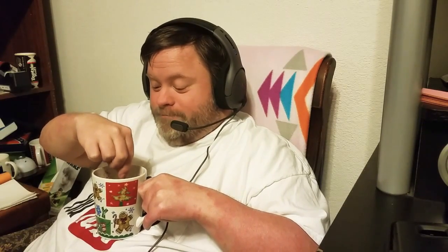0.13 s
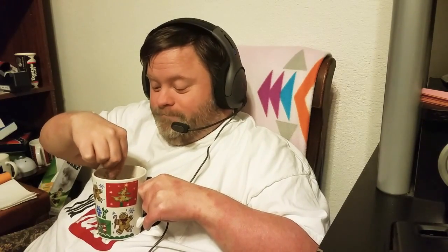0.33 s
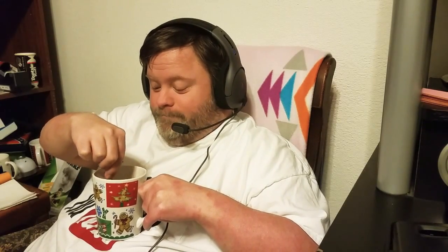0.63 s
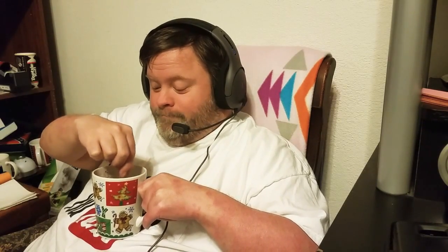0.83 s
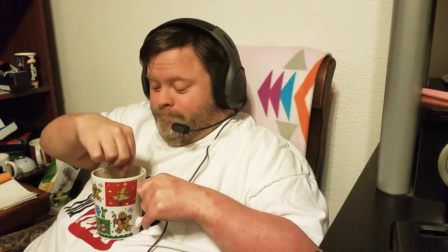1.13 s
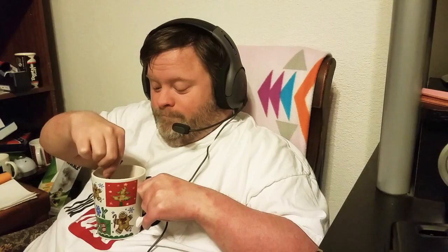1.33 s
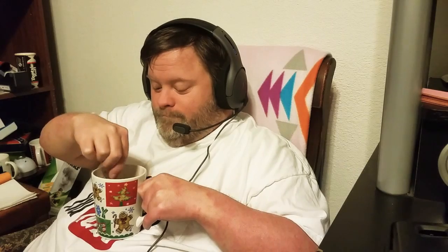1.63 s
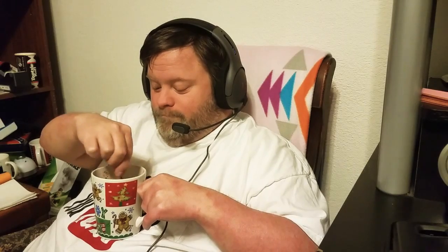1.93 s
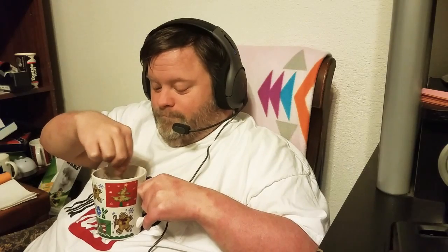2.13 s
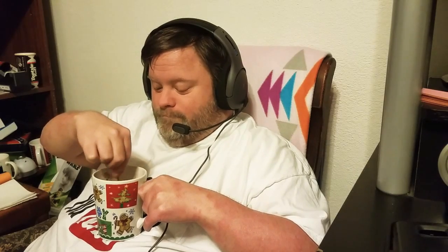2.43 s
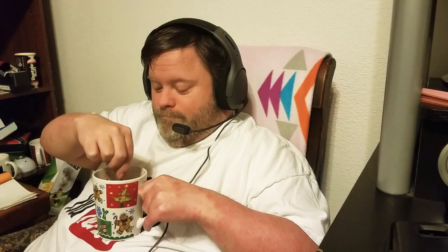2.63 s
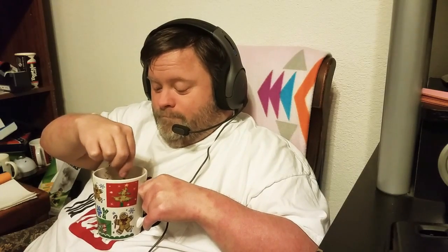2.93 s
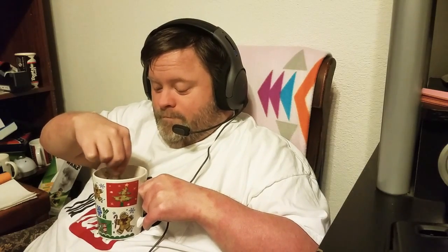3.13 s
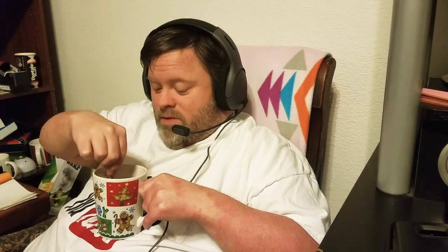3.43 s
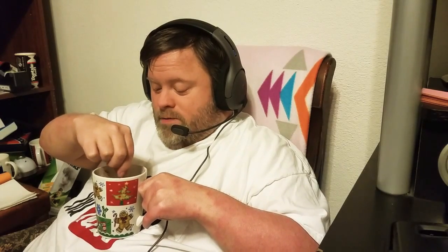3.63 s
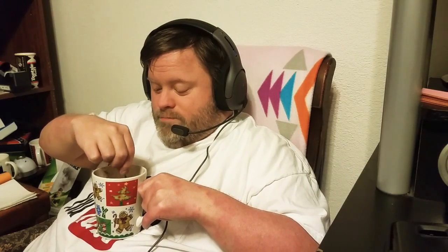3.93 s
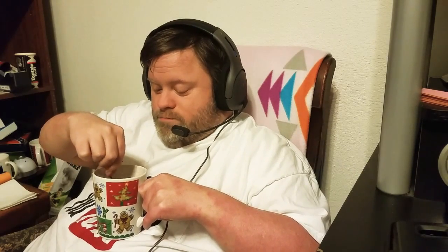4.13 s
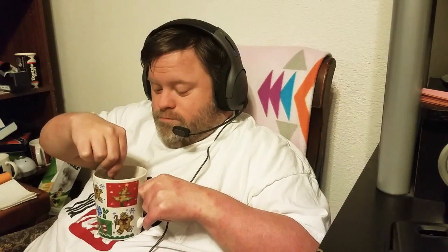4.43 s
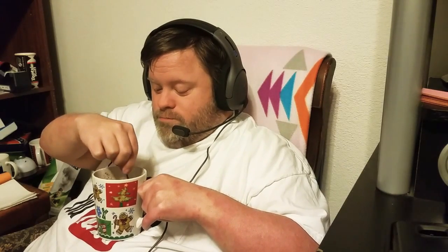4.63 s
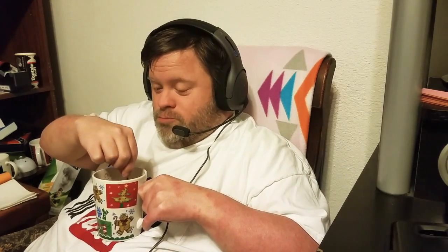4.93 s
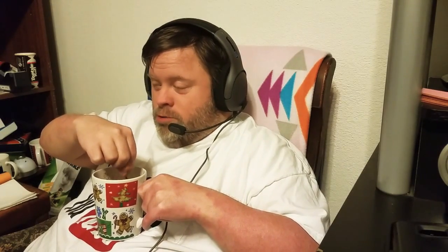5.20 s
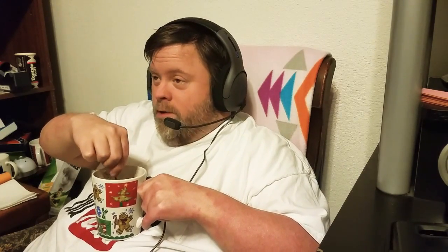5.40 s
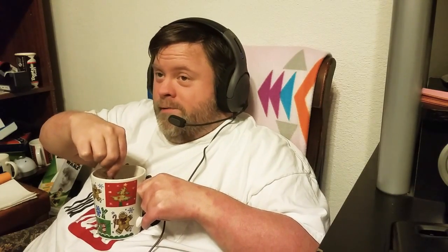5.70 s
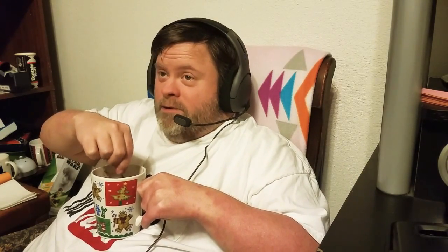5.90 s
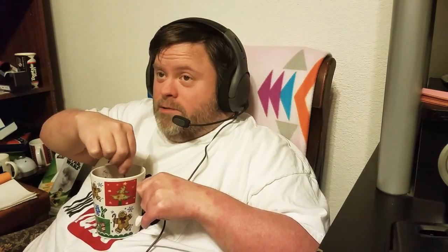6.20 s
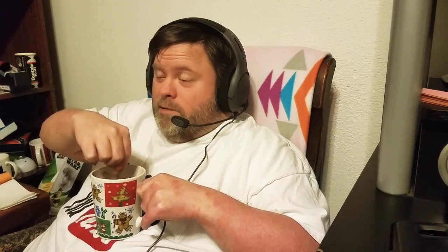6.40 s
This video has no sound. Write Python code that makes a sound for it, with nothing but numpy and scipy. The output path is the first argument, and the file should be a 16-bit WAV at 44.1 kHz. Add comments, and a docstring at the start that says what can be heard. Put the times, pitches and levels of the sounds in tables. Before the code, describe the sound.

A metal spoon stirs liquid in a hand-held ceramic mug, close up in a small furnished room. From the first moment, uneven short clinks and dull knocks mix with quiet gritty scrapes, roughly three turns a second. The ring is heavily damped. A low rumble swells near two seconds and after four; a faint hum and slight rustle come later.

```python
"""A metal spoon stirs a drink in a hand-held mug in a small, furnished room.
From the first moment it clinks unevenly on the wall: a noisy crack, a short pitched knock, damped ringing modes.
On each turn it drags across the bottom, up along the wall, then swipes back: random slips through gliding resonances.
Low rumble, shaped noise, swells most near 2 s and again after 4 s; from about 3 s a faint narrow-band
hum comes and goes, and a soft band of rustle enters after 5 s. Steady room noise lies beneath it all."""
import sys
import numpy as np
from scipy import signal
from scipy.fft import rfft, irfft
from scipy.io import wavfile
from scipy.ndimage import uniform_filter1d

SR = 44100
rng = np.random.default_rng(int(sys.argv[2]) if len(sys.argv) > 2 else 0)


def wav_out(sig):
    """Save sig, one row per channel (or a flat mono array), as 16-bit PCM at SR to the path in sys.argv[1]."""
    wavfile.write(sys.argv[1], SR, np.round(np.clip(np.atleast_2d(sig).T, -1, 1) * 32767).astype(np.int16))


N = 289119

# turns of the spoon, across the bottom and then up along the wall; levels are relative:
# start_s, bottom_length_s, wall_length_s, bottom_level_db, wall_level_db
TURNS = [(0.0, 0.13, 0.038, -48, -43.5), (0.318, 0.13, 0.1, -48.5, -47.5), (0.654, .11, 0.11, -50, -46.5),
         (0.971, 0.17, 0.08, -52, -48.5), (1.35, 0.13, 0.064, -50, -45), (1.735, 0.098, 0.13, -50.5, -49),
         (2.04, 0.096, 0.156, -53.5, -46.5), (2.43, 0.079, 0.11, -46.5, -46),
         (2.751, 0.096, 0.11, -48, -44.5), (3.13, 0.086, 0.061, -49.5, -41.5),
         (3.48, 0.08, 0.092, -45.5, -48.5), (3.858, 0.072, 0.099, -51, -46),
         (4.144, 0.13, 0.087, -52, -43.5), (4.473, 0.11, .12, -47.5, -47.5), (4.785, 0.12, 0.095, -51, -48),
         (5.099, 0.11, 0.086, -48.5, -47.5), (5.451, 0.093, 0.08, -47, -46.5),
         (5.761, .105, 0.052, -55, -46), (6.155, 0.019, 0.067, -49, -46.5), (6.348, .105, 0.32, -46.5, -51)]
WALL_HZ, SWIPE_HZ = 3528, 2150  # contact resonance at the start of a stroke
SWIPE_BRIGHT_DB = -9.5  # treble against bass
RING_DB = -27  # high ring of a knock of hardness 0 dB
SWELL_RISE_S, SWELL_FALL_S = 0.12, 0.1


def clinks(level_db=0.5, tick_db=-45, tick_hard_db=-2):
    """Every knock of the spoon, and a light tick each time it meets the wall."""
    # knocks on the mug, levels relative: start_s, level_db, pitch_hz, hardness_db
    knocks = [(0.1144, -38, 1530, -11), (0.3175, -29.5, 1453, 16.5), (0.4945, -36.5, 2550, -9),
              (0.6476, -23.5, 2970, 5), (0.6779, -41, 3180, 2), (0.7801, -31, 3760, 5),
              (0.9224, -35.5, 1960, -5.5), (0.9633, -28, 2980, 3), (0.969, -34.5, 3200, 5),
              (1.0367, -33, 1430, 0), (1.2666, -29.5, 3110, 0), (1.323, -25, 3110, 9.5),
              (1.3372, -37, 3300, 0), (1.348, -39, 3480, 0), (1.4692, -37, 3550, 2),
              (1.5578, -33, 2340, -7), (1.7241, -29.5, 2150, 8.5), (1.74, -40, 1910, -11),
              (1.8315, -33, 3620, 2), (1.982, -29, 2380, -1), (2.0334, -26.5, 2280, 8),
              (2.1285, -32.5, 1600, -11), (2.1679, -38.5, 3770, -2), (2.3077, -37.5, 1780, -5),
              (2.4157, -39, 2000, -1), (2.424, -34, 1310, 9.5), (2.6556, -36.5, 2480, -10),
              (2.738, -24, 3320, 7), (2.8505, -39, 1610, 4), (2.9674, -36.5, 2280, -12),
              (3.0731, -22, 2920, 6.5), (3.1269, -27.5, 2070, -9), (3.1955, -37, 1570, 3),
              (3.2886, -32, 2930, -3.5), (3.4218, -24, 3060, 7), (3.4754, -28.5, 1920, -7),
              (3.5444, -32, 1420, 11), (3.6066, -37.5, 2140, -3), (3.7734, -27, 2640, 5),
              (3.8553, -39.5, 1820, -11), (3.9188, -34.5, 3590, 0.5), (4.0069, -40.5, 1400, 4),
              (4.1348, -21.5, 2426, 5.5), (4.1744, -41.5, 2120, -10), (4.2635, -27.5, 1480, 5),
              (4.4693, -20.5, 3085, 4.5), (4.604, -44.5, 2540, 9.5), (4.7726, -27, 2860, 6.5),
              (4.9151, -27.5, 1440, 15), (4.9513, -31.5, 2120, -11), (5.2009, -40, 2040, -32),
              (5.277, -31, 2970, -22), (5.4474, -33.5, 1490, 5.5), (5.536, -30.5, 3410, 2),
              (5.6435, -33.5, 2380, -11), (5.7499, -25, 3075, -1), (5.8533, -27.5, 1515, 16.5),
              (5.8782, -36.5, 3630, 3), (5.9801, -30.5, 2626, -11), (6.1503, -25.5, 1465, 17.5),
              (6.2926, -32, 1810, -8), (6.3447, -28.5, 3420, 8.5), (6.369, -36.5, 2950, 8)]
    ticks = [(start_s + bottom_s, tick_db, WALL_HZ, tick_hard_db) for start_s, bottom_s, *_ in TURNS]
    out = np.zeros(N)
    for start_s, knock_db, pitch_hz, hard_db in list(knocks) + ticks:
        body_db, edge_db, ring_db = registers(knock_db, pitch_hz, hard_db)
        add(out, start_s, clink(knock_db, pitch_hz, body_db, edge_db, ring_db))
    return amp(level_db) * out


def registers(knock_db, knock_hz, hard_db):
    """Low and light knocks sound hollower; hard contacts have more edge and ring: dB against the knock."""
    octaves = np.log2(knock_hz / 2405)
    body_db = -5 - 6 * octaves - 0.3764 * (knock_db + 35)
    edge_db = -13 + 0.41 * hard_db
    return body_db, edge_db, RING_DB + hard_db


def clink(level_db, knock_hz, body_db, edge_db, ring_db, knock=2.28, knock_s=0.0015, sag=0.14,
          crack=7.6, crack_s=0.0012, chatter=0.15, chatter_s=0.0028, modes_db=-7, rise_s=0.00075,
          thud_db=-37, thud_hz=418, thud_t60=0.13, size=7000):
    """A crack, the short knock of the spoon pressed on the wall, and the damped ring of the mug."""
    # colour of the first crack of a contact: frequency_hz, relative_level_db
    crack_colour = [(500, -33.5), (850, -6), (1500, 6), (3300, 6), (4000, 1), (7000, -4), (8200, -19),
                    (10200, -17.5), (11600, -10), (12800, -15), (15000, -16), (16500, -37)]
    # registers in the order knock, body, edge, ring: low_hz, high_hz
    register_edges = [(1700, 4000), (750, 1700), (4000, 8000), (8000, 17000)]
    t = np.arange(size) / SR
    swell = t / knock_s * np.exp(1 - t / knock_s)
    pitch = knock_hz * (1 + sag * (np.exp(-t / 0.0023) - .5))  # fast, short bending waves arrive first
    blow = knock * swell * np.sin(2 * np.pi * (np.cumsum(pitch) / SR + rng.random()))

    contact = rng.standard_normal(size) * (np.exp(-t / crack_s) + chatter * np.exp(-t / chatter_s))
    crack_and_ring = crack * coloured(contact, crack_colour) + amp(modes_db) * mug_ring(t)
    sound = blow + crack_and_ring * (1 - np.exp(-t / rise_s))

    # where and how hard the spoon lands sets the weight of each register in the first 10 ms
    out = np.zeros(size)
    for edges, db in zip(register_edges, (0, body_db, edge_db, ring_db)):
        part = band(sound, edges)
        out += amp(level_db + db) * part / np.std(part[:SR // 100])

    # the air above the drink gives a faint hollow thud, slightly stronger for hard contacts
    thud_level_db = thud_db + (level_db + body_db) / 2 + 0.06 * (ring_db - RING_DB)
    return out + amp(thud_level_db - 60 * t / thud_t60) * np.sin(2 * np.pi * thud_hz * t)


def mug_ring(t, spread_db=4.0, detune=0.014):
    """Decaying modes for one point of contact: each spot on the wall weights them anew."""
    # what mug and spoon ring with, before chance detuning: frequency_hz, relative_level_db, t60_s
    mug_modes = [(849.4, -13, 0.15), (1017.5, -2, 0.06), (1243, -5.5, 0.059), (1402, 0.5, 0.061),
                 (1543, 7.5, 0.027), (1858, -1, 0.079), (2324, 6.5, 0.03), (2554, 3.5, 0.035),
                 (2943, 2, 0.014), (3180, -3, 0.06), (3490, 13, 0.016), (3920, -66, 0.021),
                 (4360, -18, 0.012), (5430, -40, 0.15), (6530, -35, 0.044), (6940, -22, 0.066),
                 (9330, -17, 0.02), (11100, -35, .05), (11200, -58, .06), (13645, -48, 0.09),
                 (13700, -34, .05)]
    hz, db, t60 = np.transpose(mug_modes)[:, :, None]
    weight, shift, phase = rng.standard_normal((3, len(mug_modes), 1))
    drift = 1 + detune * shift * np.minimum(1, 2000 / hz)  # the swirling liquid loads the low modes
    level = amp(db + spread_db * weight - 60 * t / t60)
    return (level * np.sin(2 * np.pi * (hz * drift * t + phase))).sum(0)


def scrape(level_db=-3.0, slips_per_s=5000, uneven_db=2.66, ringing=0.285, flutter_db=2, split_hz=2400):
    """Tiny slips on the glaze excite the mug and narrow gliding resonances, louder and softer with the drag."""
    # colour of the scrape: frequency_hz, relative_level_db
    grit_colour = [(200, -34), (420, -11), (620, -36), (760, -18), (900, -5), (1500, 0.5), (2300, 1.5),
                   (3500, 6), (4600, -2), (7000, -15), (8300, -20), (11500, -24.5), (16000, -25)]
    drag_db, bright_db, contact_hz = drag()
    unevenness = amp(uneven_db * np.minimum(rng.exponential(1, N), 4))
    slips = rng.standard_normal(N) * unevenness * (rng.random(N) < slips_per_s / SR)

    grit = coloured(unit(slips) + ringing * unit(travelling_ring(slips)), grit_colour)
    low = signal.sosfiltfilt(signal.butter(3, split_hz, fs=SR, output="sos"), grit)
    squeak = band(squeaks(slips, contact_hz), (880, 6000))
    sound = unit(low) + amp(bright_db) * unit(grit - low) + 0.7 * squeak

    flutter = unit(uniform_filter1d(uniform_filter1d(rng.standard_normal(N), 400), 300))
    return amp(level_db + drag_db + flutter_db * flutter) * sound


def travelling_ring(slips, turns_per_s=3, count=4, size=3000):
    """The mug's ring to the slips; its colour shifts between spots as the spoon travels round."""
    place = np.arange(N) / SR * turns_per_s
    rung = np.zeros(N)
    for k in range(count):
        near = np.maximum(np.cos(2 * np.pi * (place - k / count)), 0)
        rung += signal.fftconvolve(slips * near, mug_ring(np.arange(size) / SR))[:N]
    return rung


def squeaks(slips, contact_hz, waver=0.056, waver_hz=18, width_hz=240):
    """Narrow resonances of the spoon in the liquid, wavering around the gliding contact pitch."""
    # resonances around the contact pitch: frequency_ratio, relative_level_db
    partials = [(.7, -4), (.86, 2), (1.022, 0), (1.17, -0.5)]
    total = np.zeros(N)
    for ratio, db in partials:
        hz = ratio * contact_hz * (1 + waver * wander(waver_hz))
        total += amp(db) * resonate(slips, hz, width_hz)
    return unit(total)


def drag(slide_db=-70, lift_s=0.017):
    """Level, brightness and contact resonance of the dragging spoon, averaged by the power of its strokes."""
    # between strokes the lightest touch remains, coloured like a swipe
    at_rest = [[1], [amp(SWIPE_BRIGHT_DB) ** 2], [SWIPE_HZ]]
    power, treble, pitch = np.full((3, N), amp(slide_db) ** 2) * at_rest
    for start_s, length, rise_s, db, swell_db, bright_db, dulling_db, hz, glide in strokes():
        t = np.arange(0, length + lift_s, 1 / SR)
        along = np.minimum(t / length, 1)
        onset = np.minimum(t / rise_s, 1)
        lift = np.minimum((length + lift_s - t) / lift_s, 1) ** 2
        press = (onset * lift * amp(db + swell_db * along)) ** 2
        add(power, start_s, press)
        add(treble, start_s, press * amp(bright_db + dulling_db * along) ** 2)
        add(pitch, start_s, press * hz * 2 ** (glide * along))
    return 10 * np.log10(power), 10 * np.log10(treble / power), pitch / power


def strokes(touch_s=0.018):
    """Each stroke's start_s, length_s, rise_s, level_db, swell_db, bright_db, dulling_db, pitch_hz, glide_octaves."""
    # short swipes as the spoon swings back, levels relative: start_s, length_s, level_db
    swipes = [(0.195, 0.12, -51.5), (0.548, 0.065, -53.5), (0.925, 0.021, -50), (1.272, 0.043, -52.5),
              (1.617, .068, -50), (1.98, .03, -55), (2.315, 0.066, -51), (2.662, 0.036, -49.5),
              (3.005, 0.031, -49), (3.345, 0.047, -49), (3.672, 0.065, -55), (4.051, 0.055, -49.5),
              (4.384, 0.063, -46.5), (5.024, 0.084, -49.5), (5.348, 0.049, -47), (5.663, 0.066, -52),
              (5.981, 0.07, -48.5), (6.041, 0.076, -54), (6.292, 0.016, -43)]
    for start_s, bottom_s, wall_s, bottom_db, wall_db in TURNS:
        yield start_s, bottom_s, touch_s, bottom_db, 0, -9, -4.5, 1913, -0.25
        yield start_s + bottom_s, wall_s, touch_s, wall_db, -6, -4, 0, WALL_HZ, -0.48
    for start_s, length, db in swipes:
        yield start_s, length, 0.62 * length, db, 2, SWIPE_BRIGHT_DB, 0, SWIPE_HZ, 0.17


def room(x, wet_db=-17, first_s=.005, shift_hz=1.306, count=3, size=15000):
    """Weak, scattered reflections from near walls and furniture; their pattern shifts as the hand moves."""
    # decay of the reflections: frequency_hz, t60_s
    wall_decay = [(300, 0.38), (1000, 0.21), (3000, 0.17), (8000, 0.21), (15000, 0.22)]
    wet = np.zeros(N)
    for k in range(count):
        sparse = rng.random(size) < 2500 / SR  # 2500 reflections a second
        taps = rng.standard_normal(size) * sparse * (np.arange(size) > first_s * SR)
        hz, t, z = signal.stft(taps, SR, nperseg=256)
        decay = amp(-60 * t / at_hz(wall_decay, hz)[:, None])
        tail = signal.istft(z * decay, SR, nperseg=256)[1]
        share = np.sqrt(2 / count) * np.cos(np.pi * (shift_hz * np.arange(N) / SR + k / count))
        wet += signal.fftconvolve(x * share, tail / np.linalg.norm(tail))[:N]
    return x + amp(wet_db) * wet


def low_rumble(level_db=-1.5, lumpy_db=3, lumps_hz=16):
    """Soft low rumble: bass-heavy noise with a lumpy level, in slow swells."""
    # swells, levels relative: start_s, length_s, level_db
    rumble_swells = [(0.16, 0.44, -57), (1.86, 0.5, -43), (2.0, 0.27, -39.5), (2.36, 0.35, -56),
                     (3.91, .97, -44.5), (4.63, 0.14, -43)]
    # colour of the rumble: frequency_hz, relative_level_db_per_hz
    rumble_colour = [(11, -60), (18, -3), (43, 0), (93, 1.5), (161, -10.5), (279, -24.5), (346, -23),
                     (422, -27.5), (507, -29), (700, -38.5), (910, -62), (1540, -120)]
    lumps = amp(level_db + lumpy_db * wander(lumps_hz))
    swell = swells(rumble_swells, SWELL_RISE_S, SWELL_FALL_S)
    return lumps * swell * noise(rumble_colour + [(2000, -95)])


def hollow_hum(hum_db=-2, hum_hz=347, drone_db=-6, drone_hz=111, waver_db=3, waver_hz=10, ramp_s=0.037):
    """A faint wavering hum with a deeper partner: two narrow bands of noise."""
    # swells, levels relative: start_s, length_s, level_db
    hum_swells = [(2.98, 0.71, -66), (4.01, 0.055, -55.5), (4.185, 0.052, -53.5), (5.08, .11, -58),
                  (5.25, 1, -68), (6.38, 0.15, -62)]
    hum_band = unit(band(rng.standard_normal(N), [hum_hz * .96, hum_hz * 1.04], order=2))
    hum = amp(hum_db + waver_db * wander(waver_hz)) * hum_band
    drone_band = unit(band(rng.standard_normal(N), [drone_hz * 0.92, drone_hz * 1.12], order=2))
    drone = amp(drone_db + waver_db * wander(waver_hz)) * drone_band
    return swells(hum_swells, ramp_s, ramp_s) * (hum + drone)


def low_rustle():
    """A soft low rustle: band-passed noise in short swells."""
    # swells: start_s, length_s, level_db
    rustle_swells = [(5.15, 0.38, -68), (5.58, 0.276, -63.5)]
    # pass band: low_hz, high_hz
    rustle_edges = (295, 590)
    rustle = unit(band(rng.standard_normal(N), rustle_edges, order=2))
    return swells(rustle_swells, SWELL_RISE_S, SWELL_FALL_S) * rustle


def room_noise(level_db=-68):
    """Steady noise of the room, strongest in the bass."""
    # colour of the room noise: frequency_hz, relative_level_db_per_hz
    floor_colour = [(20, -2.5), (60, -7), (115, 0.5), (170, -7), (350, -11), (600, -12.5), (1500, -26),
                    (4000, -27.5), (8000, -30), (16000, -34)]
    return amp(level_db) * noise(floor_colour)


def amp(db):
    """Decibels to gain."""
    return 10 ** (np.asarray(db) / 20)


def unit(x):
    """Scales to rms 1."""
    return x / np.sqrt(np.mean(x ** 2) + 1e-20)


def at_hz(points, hz):
    """Reads a spectrum on a log-frequency axis."""
    f, value = np.transpose(points)
    return np.interp(np.log(hz + 1), np.log(f), value)


def add(mix, start_s, sound):
    """Mixes a sound in at its start time."""
    part = mix[max(round(start_s * SR), 0):][:len(sound)]
    part += sound[:len(part)]


def coloured(x, points, size=2048):
    """Causal (minimum-phase) filter with the given spectrum."""
    log_gain = np.log(amp(at_hz(points, abs(np.fft.fftfreq(size, 1 / SR)))))
    taps = np.fft.ifft(np.exp(np.conj(signal.hilbert(log_gain)))).real
    return signal.fftconvolve(x, taps[:size // 2])[:len(x)]


def noise(points):
    """Steady noise of rms 1 with the given spectrum."""
    gain = amp(at_hz(points, np.fft.rfftfreq(N, 1 / SR)))
    return unit(irfft(rfft(rng.standard_normal(N)) * gain, N))


def band(x, edges_hz, order=3):
    """Causal band-pass."""
    return signal.sosfilt(signal.butter(order, edges_hz, "bandpass", fs=SR, output="sos"), x)


def resonate(x, hz, width_hz, order=2):
    """A steep-sided resonance that follows the curve hz: shifts it to zero, smooths, shifts back."""
    turn = np.exp(2j * np.pi * np.cumsum(hz) / SR)
    r = np.exp(-np.pi * width_hz / SR)
    z = x * turn.conj()
    for _ in range(order):
        z = signal.lfilter([1 - r], [1, -r], z)
    return 2 * (turn * z).real


def wander(rate_hz, order=64):
    """Slow random curve of rms 1, drawn at about 500 points a second."""
    step = SR // 500
    points = rng.standard_normal(N // step + 2 * order)
    slow = signal.sosfiltfilt(signal.butter(2, rate_hz * 0.71, fs=SR / step, output="sos"), points)
    return unit(np.interp(np.arange(N) / step + order, np.arange(len(slow)), slow))


def gate(start_s, length, rise_s, fall_s):
    """Attack, hold and release, with rounded corners."""
    t = np.arange(N) / SR - start_s
    x = np.clip(np.minimum(t / rise_s + .5, (length - t) / fall_s + .5), 0, 1)
    return x * x * (3 - 2 * x)


def swells(rows, rise_s, fall_s):
    """The gain of a set of slow swells, summed in power."""
    return np.sqrt(sum((amp(db) * gate(s, length, rise_s, fall_s)) ** 2 for s, length, db in rows))


def scene():
    """All sounds come from nearly straight ahead; the treble of the stirring leans slightly left."""
    # left-right difference: frequency_hz, level_db
    width = [(100, -48.5), (1000, -63), (2500, -52.5), (5000, -38.5), (9000, -17.5), (14000, -29)]
    stirring = room(clinks() + scrape())
    side = coloured(stirring, width)
    background = low_rumble() + hollow_hum() + low_rustle() + room_noise()
    return np.array([stirring + side, stirring - side]) + background


def record(dry, cut_hz=16300):
    """Closes off the very top of the treble with a linear-phase low-pass."""
    taps = signal.firwin(301, cut_hz, window=("kaiser", 9), fs=SR)
    return signal.oaconvolve(dry, taps[None], "same")


dry = scene()
out = record(dry)
wav_out(out)
```